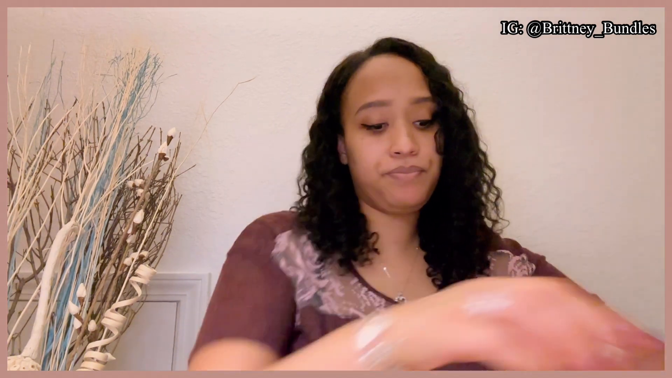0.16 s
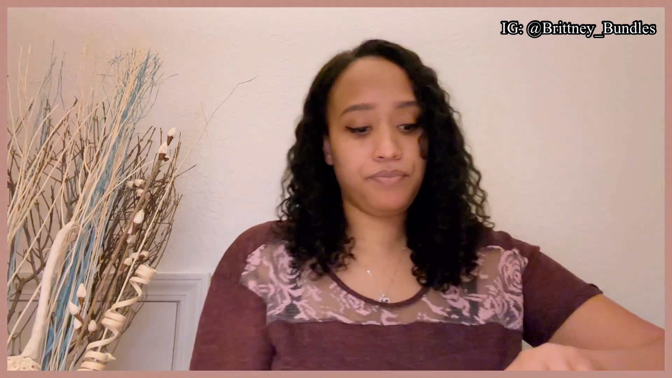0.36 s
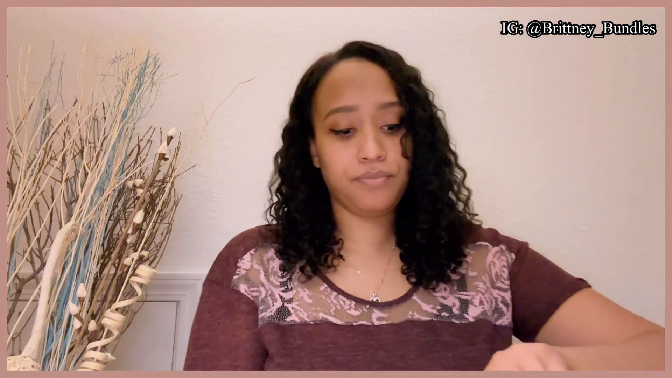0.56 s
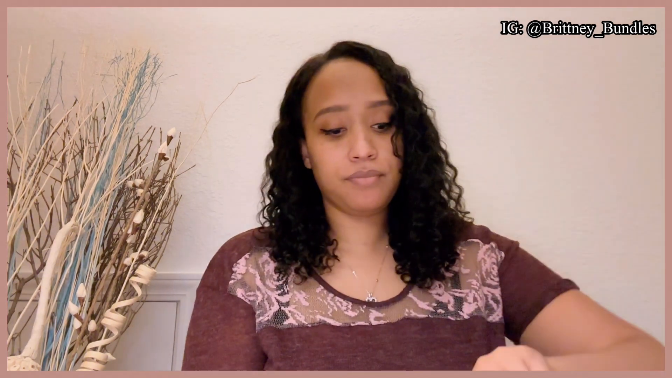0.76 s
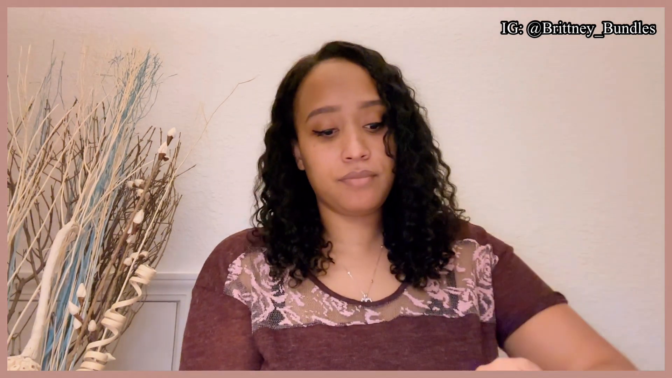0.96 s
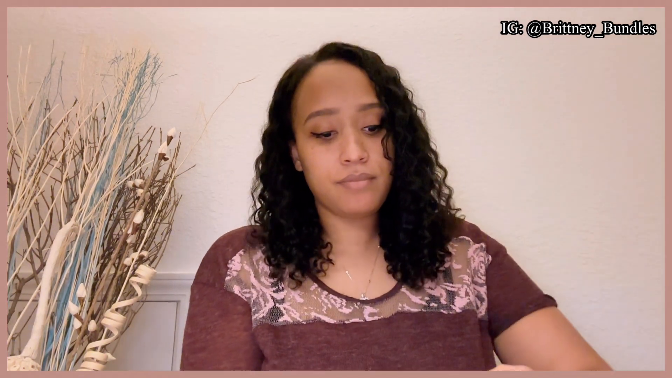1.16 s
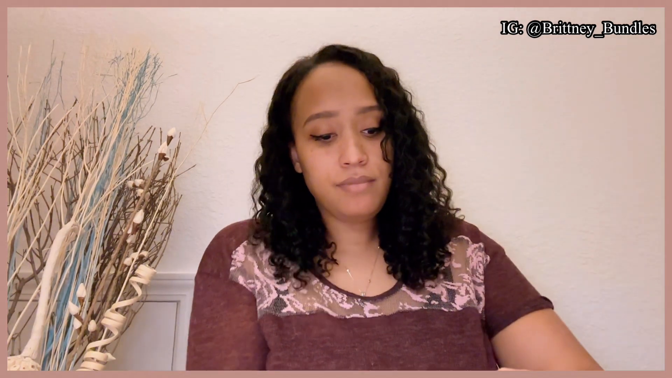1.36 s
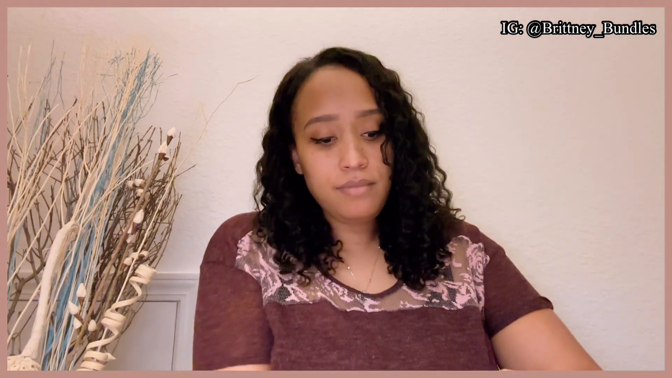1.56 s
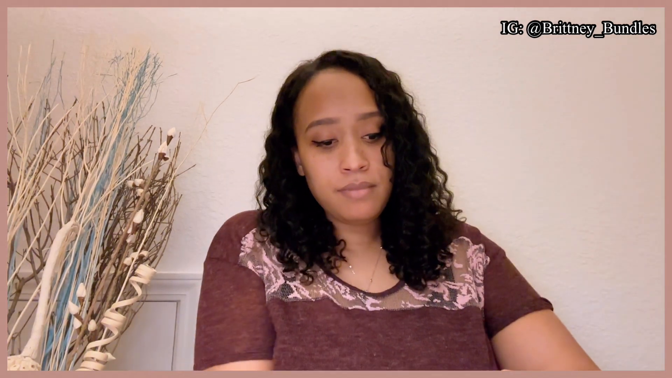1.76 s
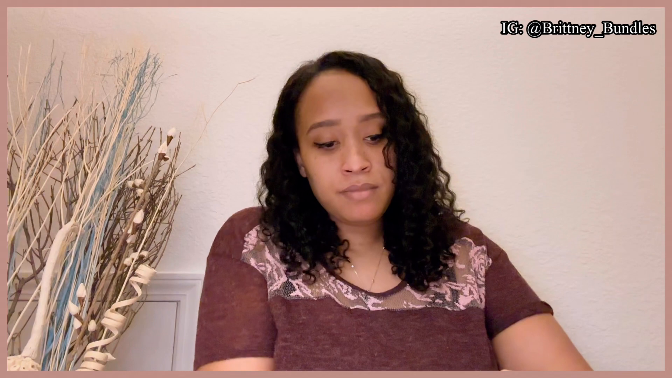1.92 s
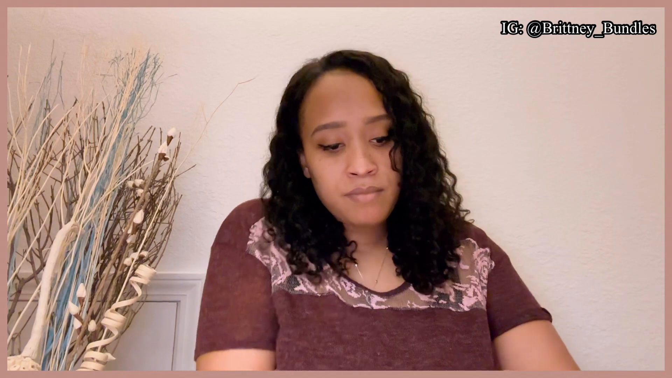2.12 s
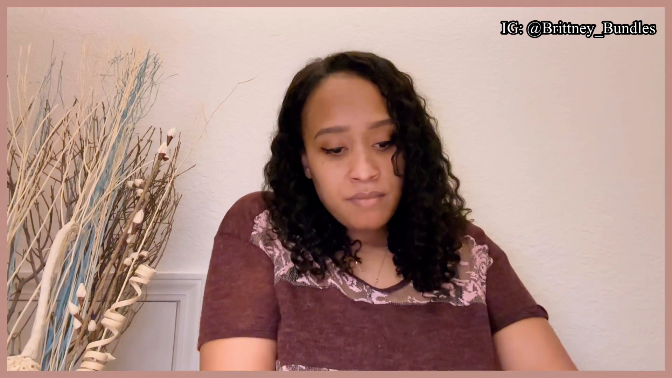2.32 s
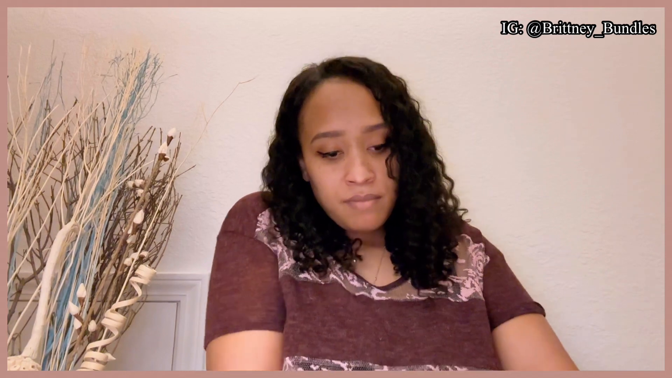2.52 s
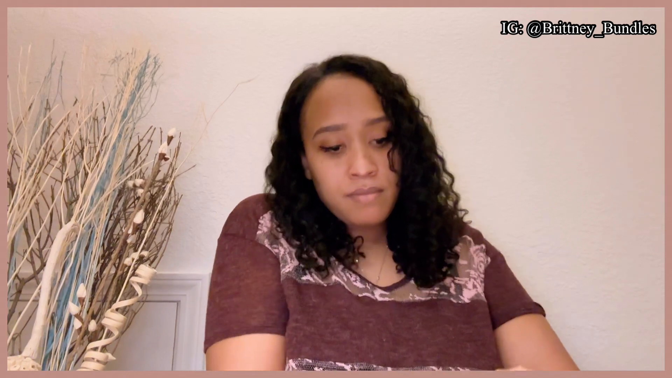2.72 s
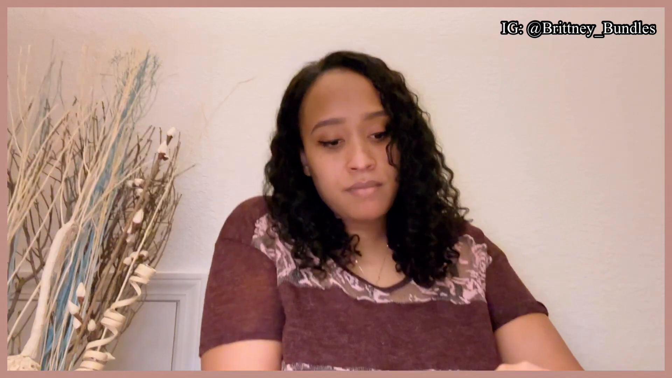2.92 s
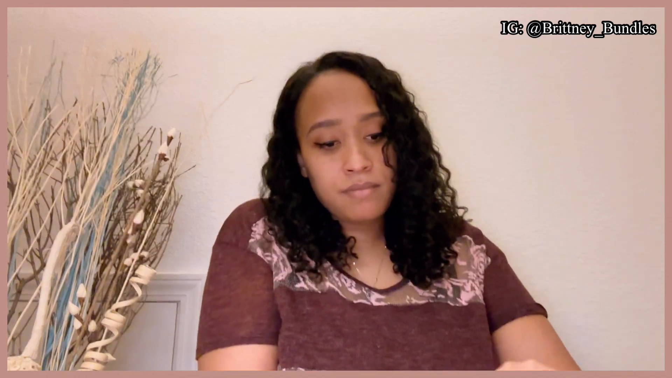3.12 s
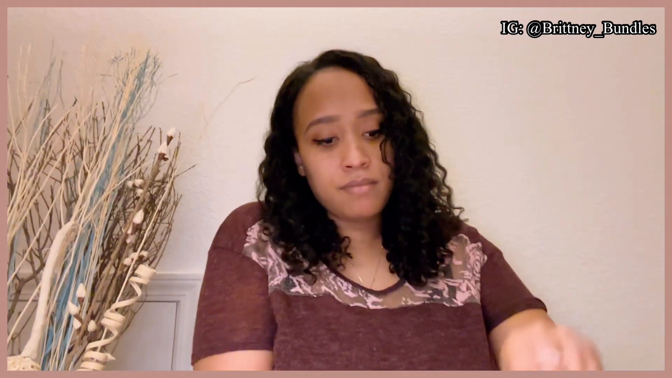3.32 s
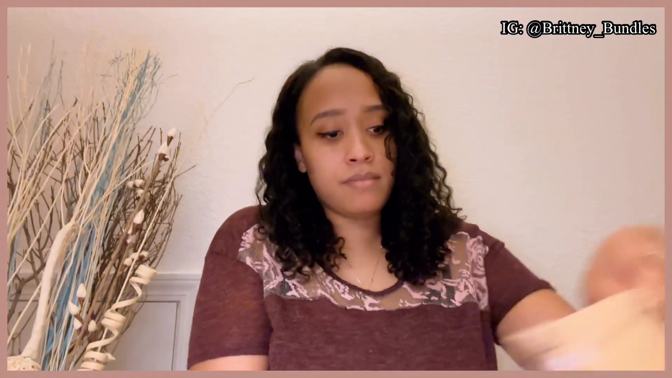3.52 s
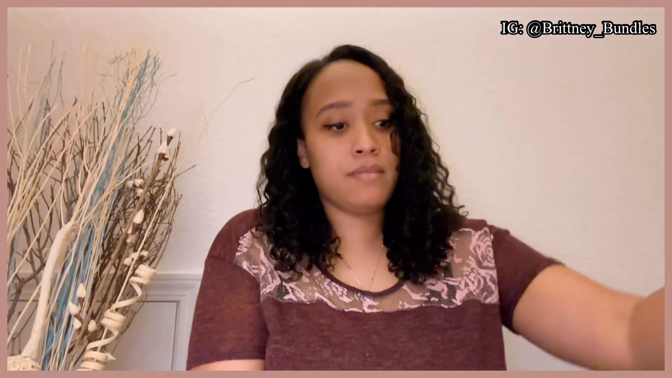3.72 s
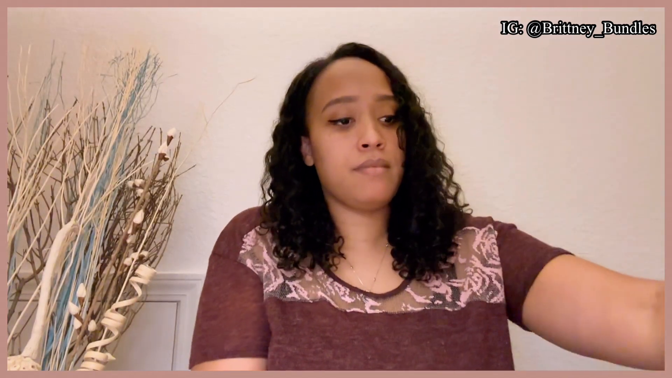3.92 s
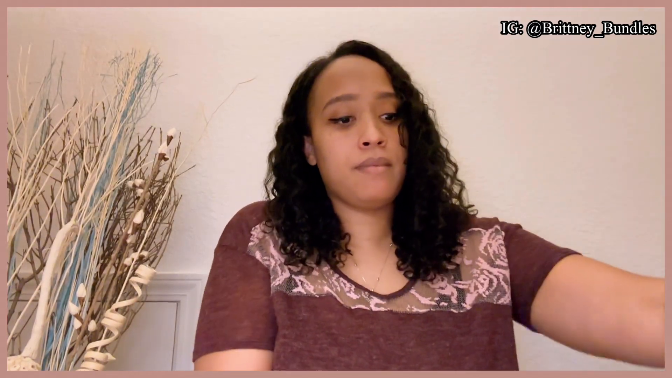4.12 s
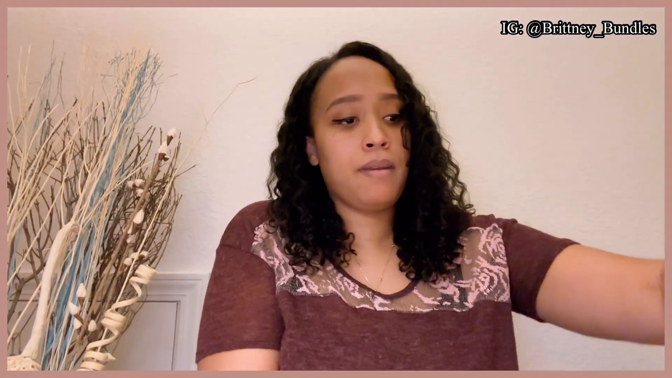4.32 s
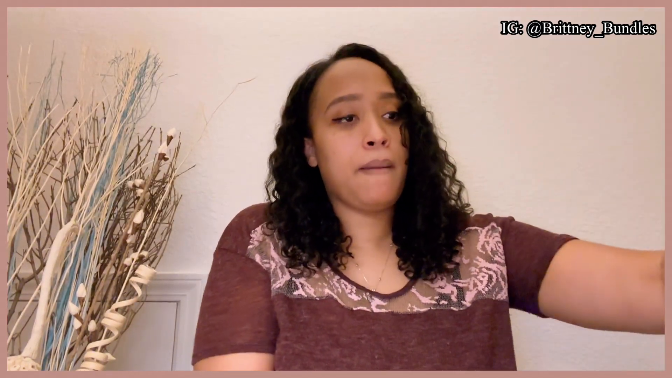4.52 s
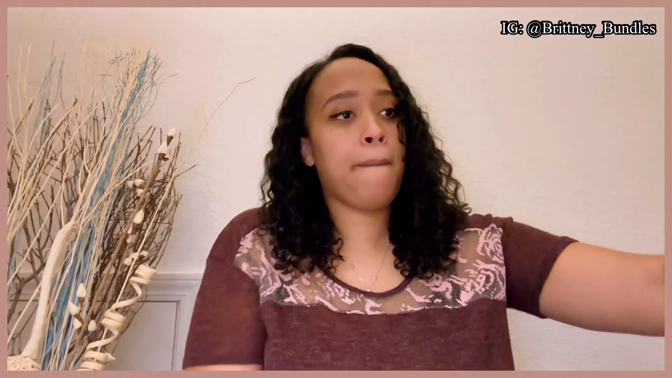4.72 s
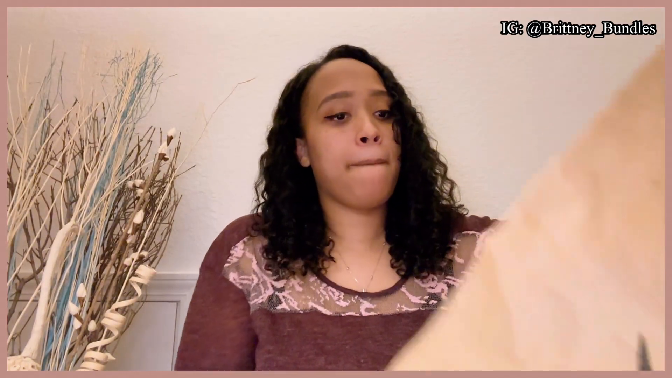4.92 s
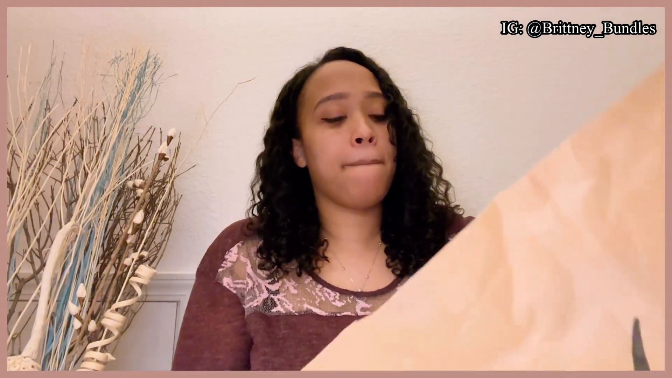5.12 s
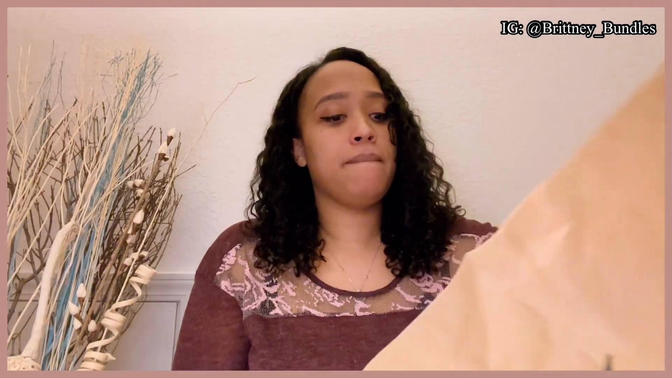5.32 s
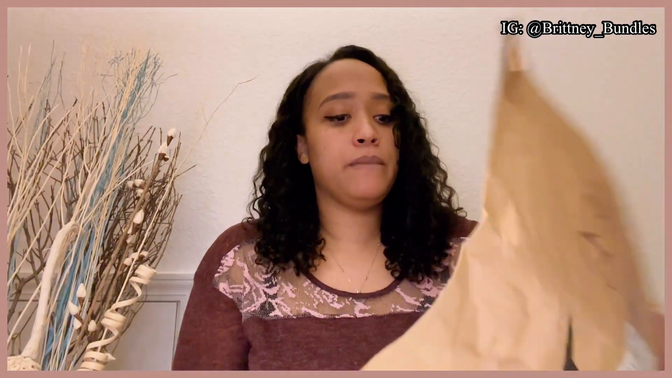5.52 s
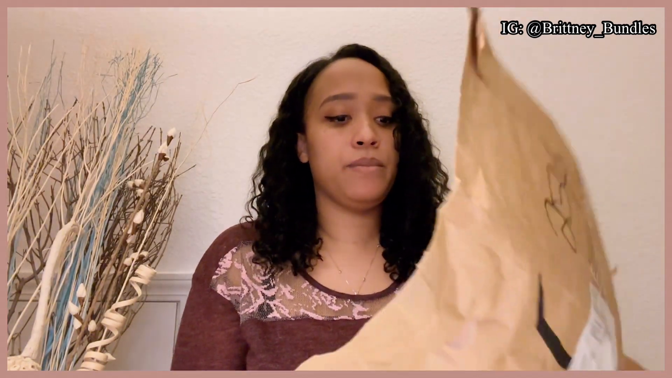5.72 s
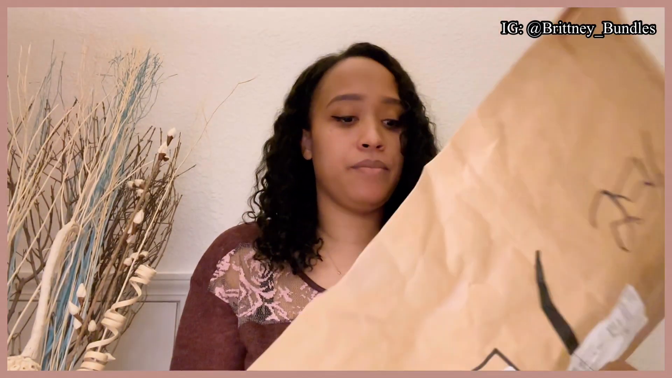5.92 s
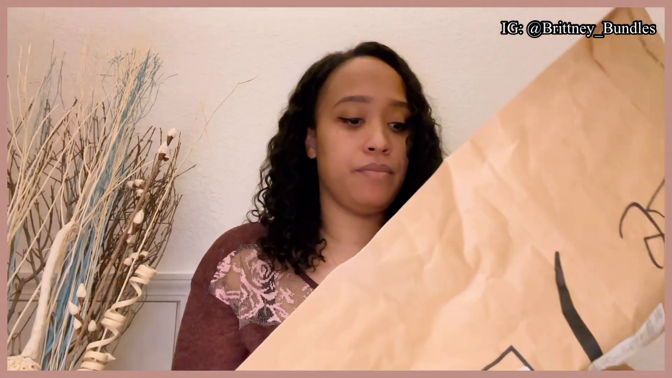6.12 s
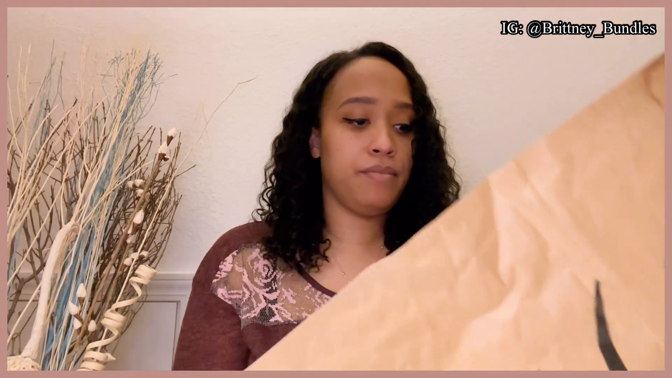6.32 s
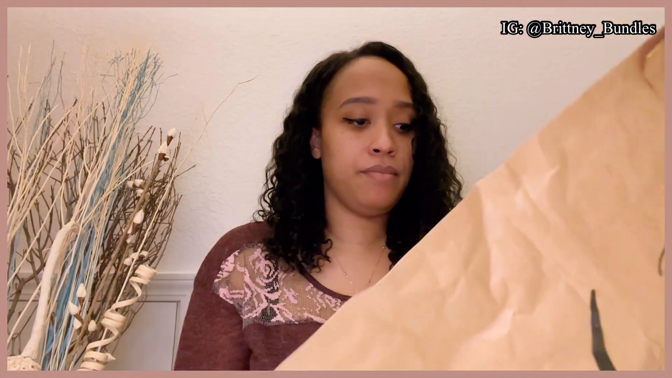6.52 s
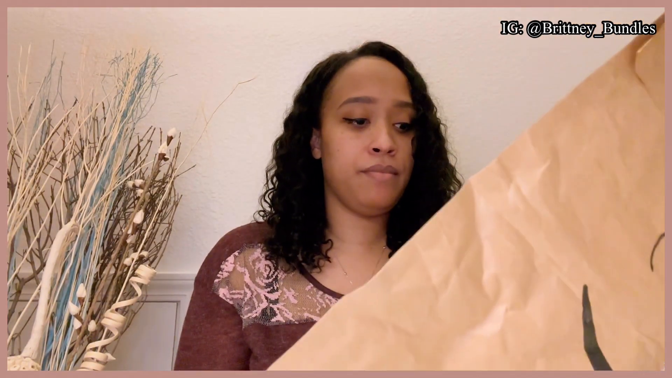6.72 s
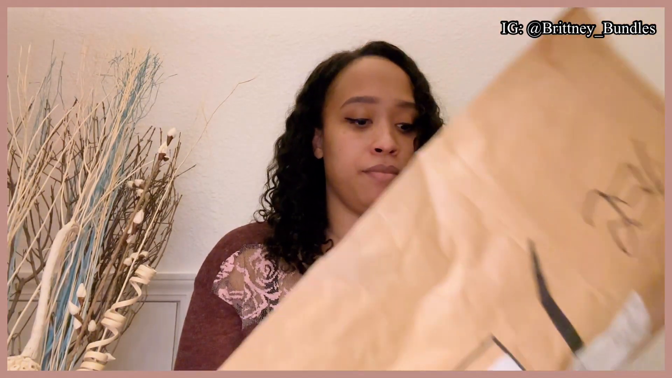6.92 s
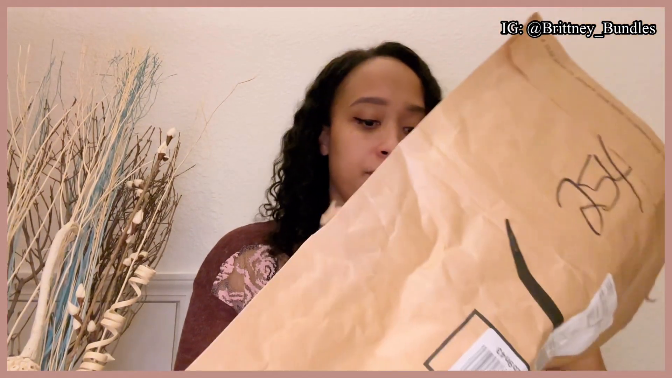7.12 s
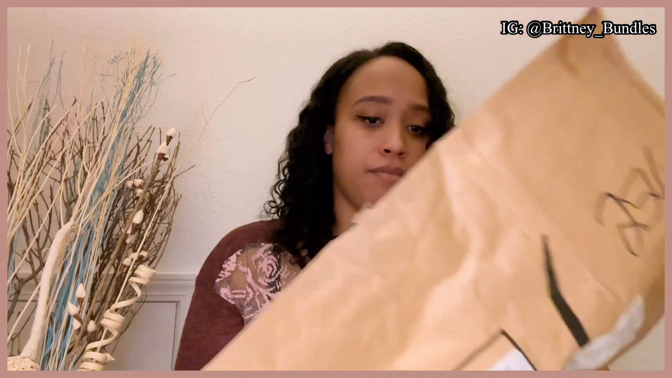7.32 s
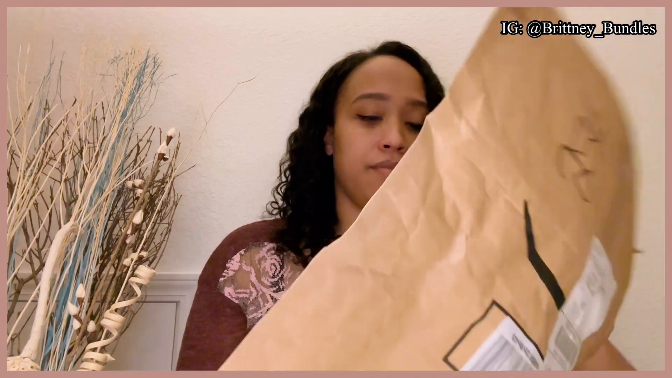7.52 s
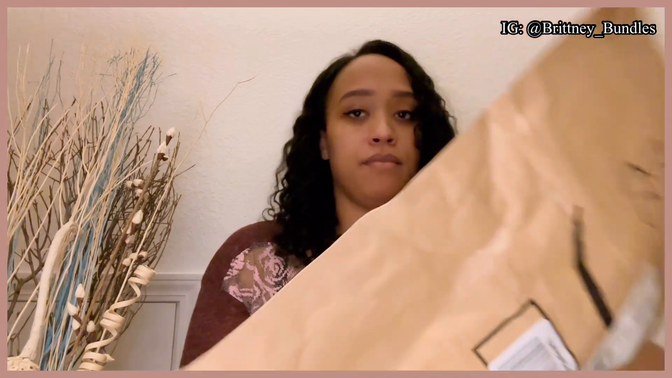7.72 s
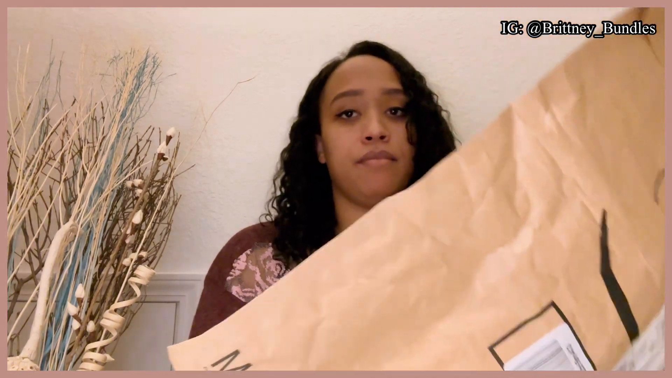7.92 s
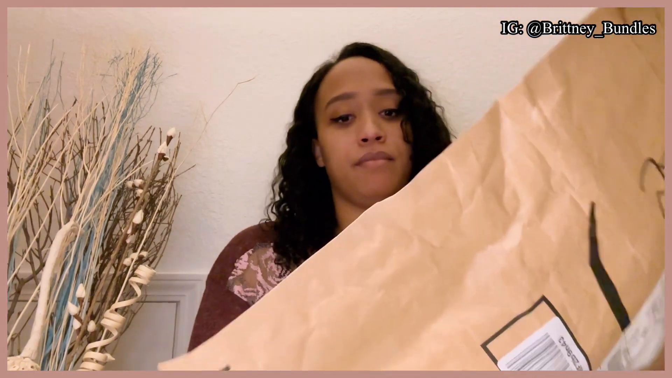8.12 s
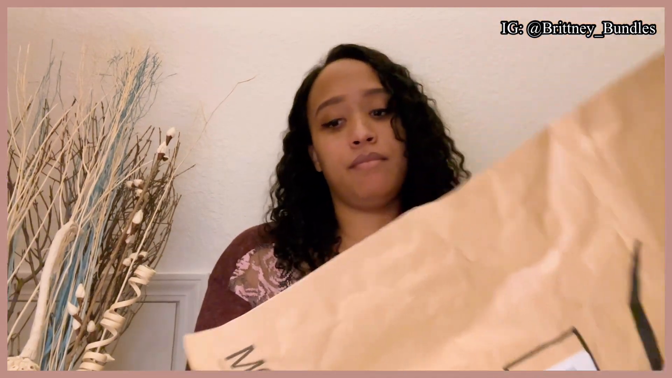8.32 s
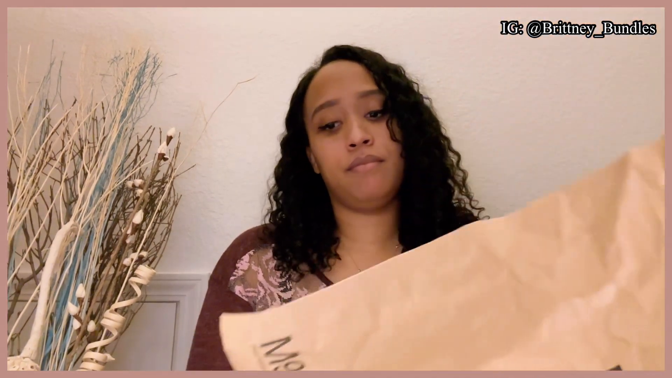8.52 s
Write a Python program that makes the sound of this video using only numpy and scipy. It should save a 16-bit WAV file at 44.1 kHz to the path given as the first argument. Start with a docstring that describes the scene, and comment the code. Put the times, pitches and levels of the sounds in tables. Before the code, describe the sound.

Close stereo pickup in a small room. A large stiff paper mailer rustles softly on a desk with fine high crinkles and tiny snaps, nearly lulls, then slaps flat twice with a scuff. Lifted, it gives duller creases, hollow panel pops, short runs of fold crackles and low bag thumps over grainy sliding.

```python
"""A large stiff paper mailer is handled close to a stereo microphone in a small room.
At first it lies on the desk, rustling, with fine crinkles, snaps and hollow pops that ring the desk top.
It slaps down twice and scuffs to rest, then is lifted; now the small crinkles are duller.
Bent and turned in the hands, its creases snap and ring their panels, folds crack in runs, panels pop and
the bag thumps. Grainy sliding noise runs throughout, and the walls add a short diffuse tail."""
import sys
import numpy as np
from scipy import signal
from scipy.fft import rfft, irfft, next_fast_len
from scipy.io import wavfile
from scipy.ndimage import uniform_filter1d

SR = 44100
rng = np.random.default_rng(int(sys.argv[2]) if len(sys.argv) > 2 else 0)


def digitize_waveform(pressure):
    """Quantize a signal to 16-bit integers and store it at the path in sys.argv[1].

    Rows of a 2-D input are taken as channels; values are limited to [-1, 1].
    """
    field = np.atleast_2d(pressure).T
    bounded = np.clip(field, -1, 1)
    quanta = np.round(bounded * 32767).astype(np.int16)
    wavfile.write(sys.argv[1], SR, quanta)


N = 377496

# Single crease snaps, higher when smaller: (time [s], crack level over 1 ms [dB], crack centre [Hz])
CREASE_SNAPS = [(0.044, -36, 13000), (0.1728, -36.5, 14000), (0.24, -35.5, 14500), (0.2855, -39, 13000),
                (0.401, -37, 3000), (0.8124, -33, 1800), (0.873, -31.5, 7600), (0.9209, -34.5, 2880),
                (0.94, -29.5, 6000), (0.9455, -27.5, 8000), (0.9509, -24.5, 6200), (0.954, -36, 6900),
                (1.0354, -34.5, 2680), (1.091, -36, 3850), (1.103, -41, 8000), (1.15, -33, 9000),
                (1.248, -31.5, 7900), (1.276, -33, 2080), (1.318, -31, 4040), (1.3661, -34.5, 14000),
                (1.392, -29.5, 2720), (1.584, -33, 14100), (1.6, -38, 6040), (1.7382, -31.5, 14300),
                (1.777, -28.5, 9300), (1.847, -25.5, 13000), (1.929, -44, 6740), (2.0507, -37.5, 4600),
                (2.1752, -38, 5200), (2.4463, -12.5, 3930), (2.4614, -24, 2600), (2.545, -26, 6940),
                (2.5855, -25.5, 13100), (2.705, -42, 2190), (2.756, -46, 2430), (3.029, -27, 4470),
                (3.05, -13.5, 9600), (3.072, -37, 6000), (3.2111, -31.5, 1940), (3.2345, -36, 2060),
                (3.2682, -34, 3000), (3.394, -38.5, 2600), (3.464, -39, 3280), (3.549, -35.5, 2070),
                (3.7109, -23, 2200), (3.8381, -25.5, 2320), (4.0568, -31, 6460), (4.1773, -29.5, 7850),
                (4.306, -28.5, 2520), (4.474, -34.5, 3200), (4.6707, -27, 2220), (4.746, -32.5, 1050),
                (4.783, -31, 5000), (4.894, -29, 3600), (4.8972, -29.5, 1900), (4.91, -15.5, 4500),
                (4.9262, -25, 2950), (4.929, -19.5, 3300), (4.9502, -28, 4200), (4.968, -31, 5000),
                (4.9743, -24.5, 3600), (5.005, -32.5, 4000), (5.132, -36, 2020), (5.3086, -30.5, 3000),
                (5.346, -15, 3400), (5.365, -29, 5630), (5.416, -26.5, 3570), (5.429, -27.5, 2800),
                (5.5045, -27.5, 2380), (5.625, -29, 2070), (5.7866, -27.5, 1420), (5.8343, -24.5, 1420),
                (5.878, -31, 1800), (5.897, -29.5, 2820), (5.9259, -20.5, 2490), (5.9645, -35, 1700),
                (5.9962, -24, 1400), (6.039, -26.5, 1160), (6.2209, -16, 3300), (6.238, -22.5, 2770),
                (6.251, -25, 2200), (6.318, -27, 2700), (6.466, -31.5, 2000), (6.544, -36, 2200),
                (6.561, -29, 2500), (6.61, -30.5, 3980), (6.8566, -18.5, 4150), (7, -25.5, 2500),
                (7.0228, -22.5, 3340), (7.04, -24, 746), (7.047, -30, 1800), (7.07, -26.5, 2800),
                (7.09, -25.5, 2200), (7.0985, -25, 2220), (7.125, -26, 2400), (7.2476, -21.5, 1990),
                (7.3456, -33, 1330), (7.355, -32.5, 1820), (7.425, -26.5, 2520), (7.4703, -23.5, 1700),
                (7.482, -26, 2700), (7.5153, -29, 2280), (7.541, -32, 1890), (7.5672, -28.5, 1240),
                (7.5792, -16, 3160), (7.6567, -24, 2400), (7.6883, -27, 2030), (7.7869, -26, 4120),
                (7.731, -25.5, 3700), (7.9636, -23, 3770), (7.983, -25, 2840), (8.1306, -28, 1480),
                (8.194, -23.5, 1300), (8.257, -35, 4470), (8.3623, -36, 3440), (8.46, -30.5, 1350),
                (8.537, -41, 3960)]
# A typical crease: crack level [dB], crack centre [Hz], panel ring re the crack [dB]
TYPICAL_DB, TYPICAL_HZ, RING_DB = -12, 2820, -10.5
# Harder and bigger (lower) creases move more of the panel: [dB per dB], [dB per octave]
RING_PER_DB, RING_DB_PER_OCTAVE = 0.07, -6
PANEL_HZ, PANEL_SCATTER_OCTAVES = 865, 0.21  # ring pitch of a typical panel and its spread

# Flat panels buckling with a hollow pop: (time [s], reference level over 1 ms [dB], pitch [Hz])
PANEL_POPS = [(0.103, -40.5, 820), (0.815, -33.5, 760), (0.925, -36, 630), (0.981, -38, 880),
              (1.036, -35, 706), (1.078, -41, 855), (1.393, -37.5, 547), (1.455, -43, 830),
              (1.476, -41, 770), (1.522, -39.5, 776), (1.544, -36, 800), (1.584, -42, 820),
              (1.598, -37.5, 672), (1.751, -39, 790), (1.765, -38, 880), (1.8184, -37.5, 860),
              (2.446, -24, 663), (2.546, -19, 657), (2.7552, -30.5, 692), (2.9181, -27, 687),
              (3.0505, -23, 574), (3.103, -37, 455), (3.144, -32, 650), (3.287, -33, 597),
              (3.311, -34, 650), (3.3945, -32, 786), (3.4411, -34.5, 623), (3.7114, -18.5, 683),
              (3.7233, -25, 1410), (3.7698, -23, 612), (3.782, -32, 1200), (3.9398, -26.5, 720),
              (4.1774, -32.5, 618), (4.418, -36, 604), (4.6388, -33, 650), (4.6697, -29.5, 547),
              (4.785, -31, 617), (4.927, -24.5, 680), (5.0047, -22, 1310), (5.0225, -26, 1220),
              (5.2325, -31, 760), (5.2997, -27.5, 1190), (5.429, -32.5, 690), (5.6253, -17, 620),
              (5.669, -31, 600), (5.9687, -24.5, 970), (6.1667, -33, 500), (6.493, -30, 834),
              (6.562, -23.5, 655), (6.572, -21, 840), (6.717, -37.5, 600), (6.771, -35.5, 780),
              (6.7971, -17.5, 750), (6.8565, -20, 1145), (6.9999, -24, 522), (7.0303, -21.5, 670),
              (8.131, -23, 602), (8.1318, -21, 1650), (8.141, -21.5, 1820), (8.1941, -25, 1700),
              (8.331, -29, 730), (8.4399, -22, 787), (8.462, -28, 860)]
# Parts of a pop, re its level: starting crack [dB] and its centre [Hz], flip [dB], accompanying ring [dB]
POP_CRACK_DB, POP_CRACK_HZ, POP_FLIP_DB, POP_RING_DB = -9, 1250, -3.5, -3.5

# Folds giving way in a run of cracks: (time [s], length [s], rms before the run fades [dB], centre [Hz])
FOLD_CRUMPLES = [(0.953, 0.036, -49.5, 3530), (1.117, 0.02, -47, 6000), (1.282, 0.083, -56, 2300),
                 (2.429, 0.019, -36.5, 2800), (3.73, 0.03, -47, 1300), (4.895, 0.017, -32, 1500),
                 (4.928, 0.07, -35, 1950), (5.63, 0.039, -37.5, 1690), (5.667, 0.082, -48.5, 2080),
                 (6.043, 0.075, -45.5, 2000), (6.242, 0.085, -38, 1640), (6.55, 0.032, -45, 955),
                 (6.971, 0.022, -40, 900), (7.004, 0.023, -35, 1500), (7.053, 0.094, -34.5, 1520),
                 (7.582, 0.025, -39.5, 1300), (7.783, 0.026, -35, 1530), (8.137, 0.025, -34.5, 1910),
                 (8.319, 0.065, -41.5, 660)]
# The mailer landing flat and scuffing to rest:
# (time [s], starting rms before the soft onset [dB], t60 [s], spectral tilt [dB per octave])
DESK_SLAPS = [(2.457, -26, 0.31, 0.5), (3.051, -32, 0.34, -0.7)]
# The whole bag flexing: (time [s], approximate peak level [dB], pitch [Hz], t60 [s])
BAG_THUMPS = [(2.458, -19.5, 250, 0.09), (2.461, -23.5, 96, 0.071), (2.708, -36.5, 277, 0.038),
              (3.052, -30, 104, 0.088), (3.055, -28, 54.4, .1), (3.721, -28, 307, 0.073),
              (4.925, -27, 337, 0.074), (5.002, -30, 83.5, 0.071), (6.291, -28.5, 56, .07),
              (6.584, -35, 78, 0.076), (7.033, -26.5, 183, 0.061), (7.794, -23.5, 61.8, .08),
              (7.778, -26, 333, 0.073), (8.201, -23, 237, 0.036)]

# Paper sliding under the hands, before layer trims and hand motion:
# (time [s], dull rubbing level [dB], rustle level [dB], hiss level [dB])
SLIDE_LEVELS = [(0.0, -61.5, -60.5, -60.5), (0.9, -57.5, -57.5, -59.5), (1.14, -67.5, -61.5, -68),
                (1.64, -70.5, -61, -66.5), (1.86, -75, -84, -78), (2.14, -78, -62.5, -69),
                (2.53, -68, -57.5, -51), (2.64, -53.5, -57, -64), (2.86, -63.5, -59.5, -62.5),
                (3.1, -52.5, -60, -59), (3.48, -59, -60, -62.5), (3.93, -59, -56, -56),
                (4.12, -55, -55, -61.5), (4.46, -57.5, -59.5, -61.5), (4.84, -56.5, -55, -56.5),
                (5.13, -56, -62, -61), (5.7, -54.5, -61, -66), (6.05, -54, -52, -59.5),
                (6.44, -50, -51.5, -59.5), (6.63, -46.5, -53.5, -62), (6.84, -49, -86, -66),
                (6.98, -57.5, -53, -54.5), (7.34, -53, -57, -61.5), (7.63, -49.5, -50.5, -54.5),
                (8.2, -55, -56, -64), (8.56, -48.5, -49.5, -57)]
# How hard the hands bend the paper: (time [s], crinkle level over the rustle [dB])
BENDING_LEVELS = [(0, -43), (.65, 10.5), (.85, 11), (1.8, 10.5), (2.43, 8.5), (2.6, 11), (3.6, 8),
                  (4.3, 10), (4.8, 8), (5.7, 11.5), (6.4, 14), (8.56, 10)]
# Quick strokes of the hand that swell and die away: (middle time [s], length [s], boost [dB])
HAND_STROKES = [(0.32, 0.34, 2.5), (0.93, 0.1, 3), (1.322, 0.11, 1), (1.556, 0.11, 6.5), (2.917, 0.15, 8.5),
                (4.707, 0.22, 6), (5.387, 0.19, 3.5), (5.957, 0.091, 6), (6.268, 0.25, 8.5),
                (6.564, 0.068, 4.5), (7.103, 0.096, 13.5), (7.26, 0.035, 10), (7.95, 0.19, 4.5)]
# The hands stop to change grip: (middle time [s], length [s])
GRIP_PAUSES = [(1.185, 0.22), (2.769, 0.075), (4.017, 0.093), (4.249, 0.098), (5.537, 0.015),
               (6.087, 0.069), (6.369, 0.15), (6.699, 0.17), (8.118, 0.17), (8.42, 0.051)]
PAUSE_DB = -11

# Colour of a crack, before its own pitch and facet: (frequency [Hz], relative level [dB])
CRACK_COLOUR = [(150, -38), (400, -29), (1000, -11), (2000, -7.5), (5000, -13.5), (6300, -8.5),
                (7700, -11.5), (10500, -9), (13000, -7.5), (16000, -21.5)]
# Colour of the dull rubbing: (frequency [Hz], relative level [dB])
RUBBING_COLOUR = [(25, 0.5), (55, 1), (100, 4.5), (170, 3), (300, 0.5), (550, 1.5), (900, -5),
                  (1600, -13.5), (4000, -37)]
# Colour of the rustle: (frequency [Hz], relative level [dB])
RUSTLE_COLOUR = [(400, -34), (1000, -2.5), (2200, 3), (3500, 4), (5500, -16), (9000, -38)]
# Colour of the fibre hiss: (frequency [Hz], relative level [dB])
HISS_COLOUR = [(3000, 5.5), (6000, 5), (7700, 9.5), (10500, 5.5), (13000, 7.5), (15000, -2), (17000, -27)]
# Colour of the desk scuff, before each slap's tilt: (frequency [Hz], relative level [dB])
SCUFF_COLOUR = [(150, -31), (500, 11), (1200, 0), (2200, 4), (4200, 3), (6300, -1), (8000, -8),
                (12000, -15), (16000, -24)]

LIFT_S = 3.4  # the mailer leaves the desk
# Lying flat only tiny wrinkles give; lifted, bigger and duller ones do
CRINKLE_FLAT_HZ, CRINKLE_LIFTED_HZ = 3630, 1170
# Resonances of the desk top: (frequency [Hz], width [Hz], level re the paper sound [dB])
DESK_MODES = [(483, 55, -6), (720, 67, -8.5)]
# Decay time of the room: (frequency [Hz], t60 [s])
ROOM_DECAY = [(100, 0.31), (500, 0.23), (2000, 0.24), (6000, 0.31), (14000, 0.17)]

PORT_LAG_S = 0.0002  # the mailer is to the right: the left port hears it later
# The left port is mostly weaker: (frequency [Hz], left level re right [dB])
LEFT_BALANCE = [(60, -8.5), (125, 0.5), (400, -5), (2000, -1), (4000, -3), (9000, 1.5)]
# Power common to both channels in the treble: (frequency [Hz], share [0-1])
SHARED_TREBLE = [(5700, 0), (8000, 0.56), (10800, 1), (13000, 1)]
# How far the left lags in the shared treble: (frequency [Hz], phase lag [radians])
TREBLE_PHASE = [(7200, 2.5), (10000, 0.47), (11800, -2.1), (15500, -2)]
TOP_HZ = 16400  # top of the finished sound


def creases(lead_s=0.0037, step_s=.0025, step_db=-10, step_db_per_octave=-5, step_octaves=0.54):
    """Single snaps ring the panel by force and size, then crack again, more strongly in big creases."""
    out = np.zeros((2, N))
    for s, db, hz in CREASE_SNAPS:
        smallness = np.log2(hz / TYPICAL_HZ)
        force_db = RING_PER_DB * (db - TYPICAL_DB)
        ring_db = db + RING_DB + force_db + RING_DB_PER_OCTAVE * smallness
        ring_hz = PANEL_HZ * 2 ** (PANEL_SCATTER_OCTAVES * rng.standard_normal())
        add(out, s - lead_s, snap(hz, db, ring_hz, ring_db))
        second = crack(hz * 2 ** (step_octaves * rng.standard_normal()))
        second_db = db + step_db + step_db_per_octave * smallness
        add(out, s - lead_s + step_s * rng.uniform(0.54, 2), undb(second_db) * second)
    return out


def snap(hz, db, ring_hz, ring_db, lead_s=0.003248):
    """A crack and, starting just before its flip, the ring of its panel."""
    out = np.zeros((2, 4096))
    tick, ring, start = crack(hz), panel(ring_hz), int(lead_s * SR)
    out[:, :tick.shape[1]] += undb(db) * tick
    out[:, start:start + ring.shape[1]] += undb(ring_db) * ring
    return out


def crack(hz, width_s=0.00025, lead_db=-21, lead_s=0.0042, flutter_db=-14, flutter_s=0.0073,
          octaves=1.244, apart=0.37, travel_s=0.000535, size=1024):
    """A crease strains, flips abruptly and flutters briefly; dull ones are bigger and slower."""
    t = np.arange(size) / SR - .004  # the flip is centred 4 ms in
    flip = np.exp(-.5 * (t / (width_s * (4000 / hz) ** 1.05)) ** 2)  # width_s holds at 4 kHz
    lead = (t < 0) * np.exp(-np.abs(t) / lead_s)
    flutter = (t >= 0) * np.exp(-np.abs(t) / flutter_s)
    noise = rng.standard_normal((3, size))
    burst = np.array([unit(row) for row in flip * noise])
    x = burst + (undb(lead_db) * unit(lead) + undb(flutter_db) * unit(flutter)) * noise
    f = freqs(x)
    even = uniform_filter1d(np.abs(rfft(x)) ** 2, size=24, axis=1) ** -.5  # a sudden flip feeds all frequencies
    # low bending waves travel slowly and arrive last; travel_s is the delay at 1 kHz
    spread = np.exp(-4j * np.pi * travel_s * np.sqrt(1000 * f))
    colour = facet(f) * undb(on_log(f, CRACK_COLOUR)) * bell(f, hz, octaves)
    x = shape(x, even * spread * colour)
    lag_s = PORT_LAG_S * (1 + 0.29 * rng.standard_normal())
    return ports(x, apart, lag_s, point_hz=7600) * np.sqrt(SR / 1000 / size)  # energy of 1 ms at rms 1


def facet(f, ripple_db=3.0, count=16):
    """Each facet of the crumpled sheet has its own peaks and dips."""
    knots = np.linspace(np.log(CRACK_COLOUR[0][0]), np.log(SR / 2), count)
    return unit(undb(np.interp(np.log(f), knots, ripple_db * rng.standard_normal(count))))


def panel(hz, span=1.421, octaves=0.62, cycles=3.64, rise_s=0.00024, count=12, size=2048):
    """The panel beside the crease rings for a few cycles in a cluster of bending modes."""
    t = np.arange(size) / SR
    places = np.linspace(-1, 1, count) + rng.uniform(-0.86, 1, count) / count
    f = hz * 2 ** (span * places)[:, None]  # span in octaves to each side
    weights = 1 / (1 + (np.log2(f / hz) / octaves) ** 2)
    modes = weights * np.exp(-f * t / cycles + 2j * np.pi * f * t)
    phases = np.exp(2j * np.pi * rng.random((3, count)))
    x = (phases @ modes).real * (1 - np.exp(-t / rise_s))
    return ports(x, 0.83) * np.sqrt(SR / 1000 / size)


def pops(lead_s=.0034):
    """Panels flip through: a dull crack, a falling hollow note and a little ring."""
    out = np.zeros((2, N))
    for s, db, hz in PANEL_POPS:
        add(out, s - lead_s, snap(POP_CRACK_HZ, db + POP_CRACK_DB, hz, db + POP_RING_DB))
        add(out, s, undb(db + POP_FLIP_DB) * buckle(hz))
    return out


def buckle(hz, start=2.118, end=0.632, glide_s=0.0019, cycles=1.77, scatter_octaves=0.17, size=1024):
    """A panel flips through in a few swings, falling in pitch as the slow, long waves arrive."""
    t = np.arange(size) / SR
    glide = end + (start - end) * np.exp(-t / glide_s)  # multiples of hz
    pitch = hz * glide * 2 ** (scatter_octaves * rng.uniform(-0.9, 1, (3, 1)))
    turns = np.cumsum(pitch, axis=1) / SR + rng.random((3, 1))
    swing = t * hz / cycles
    x = np.sin(2 * np.pi * turns) * swing * np.exp(-.5 * swing ** 2)
    return ports(x, 0.46) * np.sqrt(SR / 1000 / size)


def crumples(fade=1.0, scatter_db=5.0, scatter_octaves=0.59, octaves=0.39, ring_db=-9, ring_hz=720,
             ring_octaves=0.32, count=28):
    """Cracks of all sizes run along a fold, facing every way, shake the panels beside it and die down."""
    out = np.zeros((2, N))
    for s, length, db, hz in FOLD_CRUMPLES:
        along = (np.arange(count) + rng.uniform(-0.58, .5, count)) / count
        sizes = unit(undb(scatter_db * rng.standard_normal(count)))
        # share the run's energy among its cracks
        sizes = undb(db) * sizes * np.exp(-fade * along) * np.sqrt(1000 * length / count)
        for place, size in zip(along, sizes):
            bright, pitch = rng.standard_normal(2)
            tick = crack(hz * 2 ** (scatter_octaves * bright), octaves=octaves, apart=1.0)
            ring = panel(ring_hz * 2 ** (ring_octaves * pitch), size=1024)
            add(out, s - .003 + place * length, size * tick)
            add(out, s + place * length, size * undb(ring_db) * ring)
    return out


def slaps(rise_s=0.00068, flutter_db=1.0, flutter_s=0.0058, size=12000):
    """The whole face of the sheet meets the desk: countless tiny contacts that die away unevenly."""
    out, t = np.zeros((2, N)), np.arange(size) / SR
    for s, db, t60, tilt_db in DESK_SLAPS:
        contacts = grains(size, per_s=1800, spread=6.1, grain_s=0.0019)
        f = freqs(contacts)
        scuff = ports(shape(contacts, undb(on_log(f, SCUFF_COLOUR) + tilt_db * np.log2(f))), 2.2)
        flutter = np.interp(t / flutter_s, np.arange(size), rng.standard_normal(size))
        fall = undb(db - 60 * t / t60 + flutter_db * flutter)
        add(out, s, scuff * (1 - np.exp(-t / rise_s)) * fall)
    return out


def thumps(rise_s=0.0018, octaves=0.39, size=16384):
    """The flexing bag pushes out a low, rough puff: a narrow noise band that decays."""
    out, t = np.zeros((2, N)), np.arange(size) / SR
    for s, db, hz, t60 in BAG_THUMPS:
        fall = (1 - np.exp(-t / rise_s)) * undb(-60 * t / t60)
        noise = rng.standard_normal((3, size))
        puff = ports(shape(noise, bell(freqs(noise), hz, octaves)) * fall, 0.49)
        # turn overall rms into an approximate peak level
        add(out, s, undb(db) * puff * np.sqrt(np.mean(fall ** 2) / 2))
    return out


def crinkles(ring_hz=740, ring_db=-5, spread_db=2.5, scatter_octaves=0.64, count=380):
    """Many small wrinkles pop at random while the sheet moves, more strongly the harder it is bent."""
    out, time = np.zeros((2, N)), np.arange(N) / SR
    s, _, rustle_db, _ = np.transpose(SLIDE_LEVELS)
    bending_db = np.interp(time, *np.transpose(BENDING_LEVELS))
    strain_db = np.interp(time, s, rustle_db) + bending_db + motion()
    for t in (np.arange(count) + rng.uniform(-1, 2, count)) / count * N / SR:
        db = np.interp(t, time, strain_db) + spread_db * min(rng.exponential(), 3)
        bright, pitch = rng.standard_normal(2)
        hz = CRINKLE_FLAT_HZ if t < LIFT_S else CRINKLE_LIFTED_HZ
        add(out, t, snap(hz * 2 ** (scatter_octaves * bright), db, ring_hz * 2 ** (.5 * pitch), db + ring_db))
    return out


def slide():
    """Sliding paper: soft bumps, a grainy rustle and fine fibre hiss; on the desk the rubbing is even."""
    s, *levels = np.transpose(SLIDE_LEVELS)
    size = next_fast_len(N)
    on_desk = np.arange(size) / SR < LIFT_S
    flat_bumps = grains(size, per_s=900, spread=1.1, grain_s=0.0083)
    lifted_bumps = grains(size, per_s=300, spread=4.0, grain_s=0.0081)
    flat_scrape = grains(size, per_s=660, spread=2.2, grain_s=0.0031)
    lifted_scrape = grains(size, per_s=490, spread=2.9, grain_s=0.0052)
    bumps = np.where(on_desk, flat_bumps, lifted_bumps)
    scrape = np.where(on_desk, flat_scrape, lifted_scrape)
    fibres = grains(size, per_s=1600, spread=1.1, grain_s=0.0028)
    # signal, colour, stereo spread, trim [dB]
    layers = [(bumps, RUBBING_COLOUR, .4, 1.5), (scrape, RUSTLE_COLOUR, .9, -2.5), (fibres, HISS_COLOUR, .9, 1.5)]
    out = 0
    for (x, colour, apart, trim_db), db in zip(layers, levels):
        x = ports(shape(x, undb(on_log(freqs(x), colour))), apart)[:, :N]
        out = out + x * undb(trim_db + np.interp(np.arange(N) / SR, s, db))
    return out * undb(motion())


def grains(size, per_s, spread, grain_s):
    """Noise gated by tiny fibre slips at random moments: most are weak, a few strong."""
    strength = undb(spread * np.minimum(rng.exponential(size=size), 4))  # spread in dB
    slips = (rng.random(size) < per_s / SR) * strength
    power = signal.lfilter([1], [1, -np.exp(-2 / (grain_s * SR))], slips ** 2)
    return unit(np.sqrt(power) * rng.standard_normal((3, size)))


def motion():
    """Strokes lift the level of the sliding and crinkling, and pauses lower it (dB)."""
    strokes_db = sum(db * swell(s, length) for s, length, db in HAND_STROKES)
    return strokes_db + PAUSE_DB * sum(swell(s, length) for s, length in GRIP_PAUSES)


def swell(middle, length):
    """A smooth rise and fall, 1 at its middle."""
    return np.cos(np.pi * np.clip((np.arange(N) / SR - middle) / length, -.5, .5))


def desk(x):
    """Paper impacts ring two resonances of the desk top under the mailer, until it is lifted."""
    f = freqs(x)
    modes = sum(undb(db) / (1 + 1j * (f ** 2 - hz ** 2) / (f * width)) for hz, width, db in DESK_MODES)
    return shape(x * (np.arange(N) / SR < LIFT_S), modes)


def room(x, wet_db=-9.5, count=8):
    """The mailer keeps moving, so each of eight stretches gets its own pattern of reflections."""
    wet, step = np.zeros((2, N)), N // count + 1
    for i in range(0, N, step):
        add(wet, i / SR, undb(wet_db) * signal.fftconvolve(x[:, i:i + step], walls(), axes=1))
    return x + wet


def walls(treble_db=-2.5, first_s=0.0047, alike_hz=350, size=20000):
    """Desk and walls answer after a few milliseconds with a diffuse tail, decaying by frequency band."""
    t, tail = np.arange(size) / SR, 0
    mid, side = rng.standard_normal((2, size))
    for hz in 62.5 * 2 ** np.arange(9):  # octave bands
        width = min(hz / alike_hz, 1)  # long waves reach both ports alike
        noise = (mid + width * side * np.array([[1], [-1]])) / np.hypot(1, width)
        band = shape(noise, np.maximum(1 - np.abs(np.log2(freqs(noise) / hz)), 0))
        # treble_db is the starting tilt at 8 kHz
        tail = tail + band * undb(treble_db * hz / 8000 - 60 * t / on_log(hz, ROOM_DECAY))
    return unit(tail * (1 - np.exp(-(t / first_s) ** 2))) / np.sqrt(size)


def ports(three, apart, lag_s=PORT_LAG_S, point_hz=30000):
    """A shared wave reaches the left port late; the wide sheet adds separate waves, fading above point_hz."""
    f = freqs(three)
    shared = np.array([shape(three[0], np.exp(-2j * np.pi * f * lag_s)), three[0]])
    return unit(shared + shape(three[1:], apart / (1 + (f / point_hz) ** 4)))


def narrow(x):
    """The high treble is nearly the same wave in both channels, shifted in phase."""
    f = freqs(x)
    share = np.clip(on_log(f, SHARED_TREBLE), 0, 1)
    own = shape(x[0], np.sqrt(1 - share))
    common = shape(x[1], np.sqrt(share) * np.exp(-1j * on_log(f, TREBLE_PHASE)))
    return np.array([own + common, x[1]])


def undb(db):
    """Decibels to gain."""
    return 10 ** (np.asarray(db) / 20)


def unit(x):
    """Scale to rms 1."""
    return x / np.sqrt(np.mean(x ** 2) + 1e-20)


def freqs(x):
    """Frequencies of the spectrum of x, at least 1 Hz."""
    return np.maximum(np.fft.rfftfreq(x.shape[-1], 1 / SR), 1)


def on_log(hz, points):
    """Read (Hz, value) points on a log-frequency axis."""
    f, value = np.transpose(points)
    return np.interp(np.log(hz), np.log(f), value)


def shape(x, gain):
    """Filter by a gain per frequency."""
    return irfft(rfft(x) * gain, x.shape[-1])


def bell(f, hz, octaves):
    """A smooth hump around hz."""
    return np.exp(-.5 * (np.log2(f / hz) / octaves) ** 2)


def add(out, s, x):
    """Mix x in from time s."""
    i = max(int(s * SR), 0)
    out[:, i:i + x.shape[1]] += x[:, :max(N - i, 0)]


def scene():
    """All the paper sounds, in the room, balanced between left and right."""
    snaps = creases() + pops() + crumples() + slaps()
    both = room(snaps + desk(snaps) + crinkles() + thumps() + slide())
    halves = np.array([[.5], [-.5]])  # each side takes half of the level difference
    return shape(both, undb(halves * on_log(freqs(both), LEFT_BALANCE)))


def record(dry, low_hz=42):
    """The deepest bass is cut, the treble is drawn to the centre and the sound stops above TOP_HZ."""
    high_pass = signal.butter(4, low_hz, "high", fs=SR, output="sos")
    low_pass = signal.ellip(8, .2, 70, TOP_HZ, fs=SR, output="sos")
    return signal.sosfilt(low_pass, signal.sosfilt(high_pass, narrow(dry)))


dry = scene()
out = record(dry)
digitize_waveform(out)
```